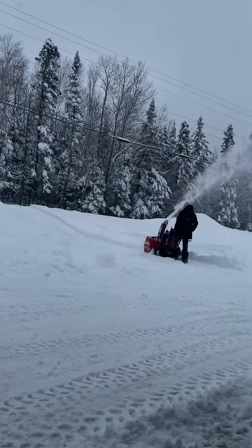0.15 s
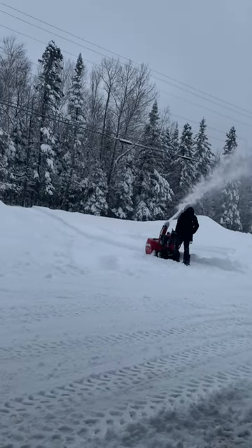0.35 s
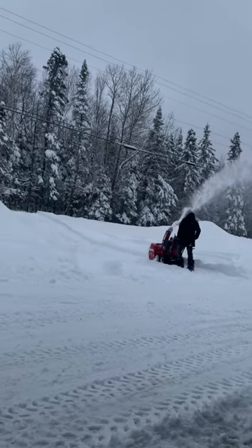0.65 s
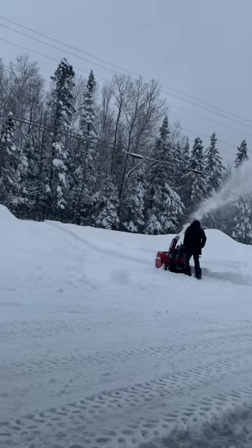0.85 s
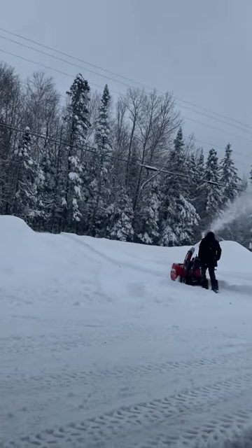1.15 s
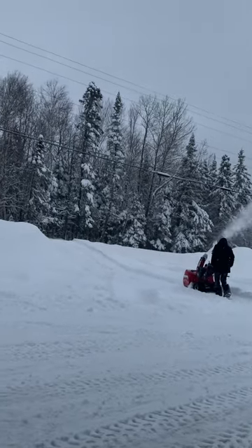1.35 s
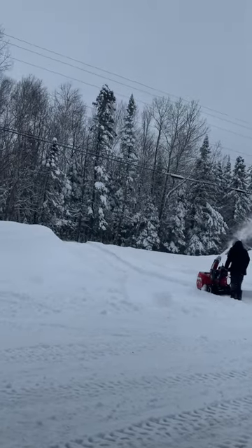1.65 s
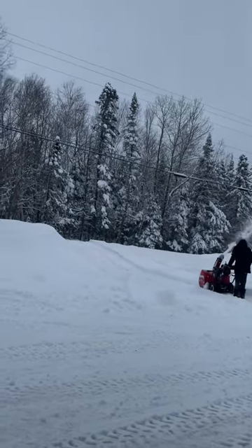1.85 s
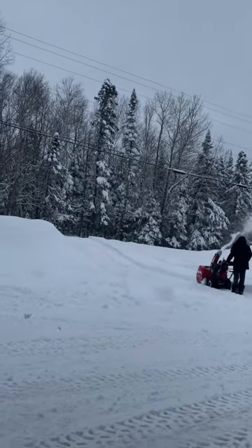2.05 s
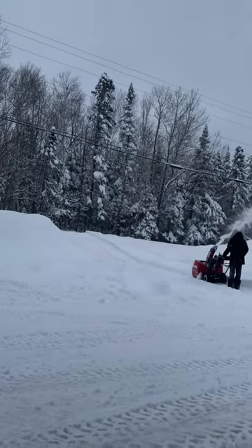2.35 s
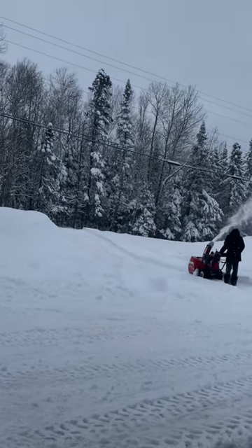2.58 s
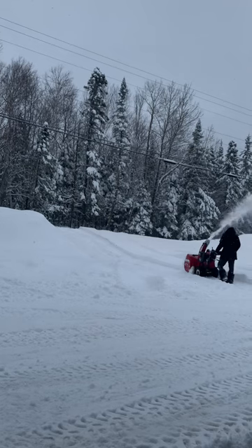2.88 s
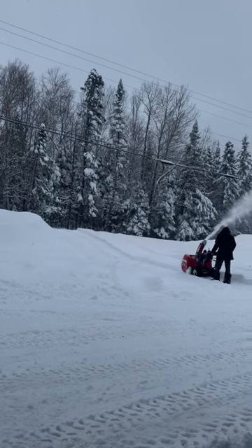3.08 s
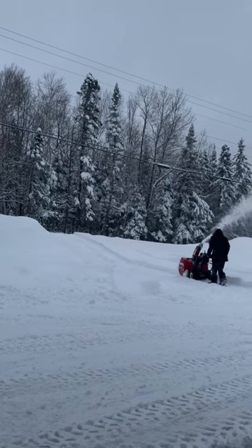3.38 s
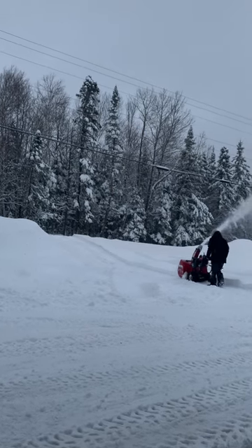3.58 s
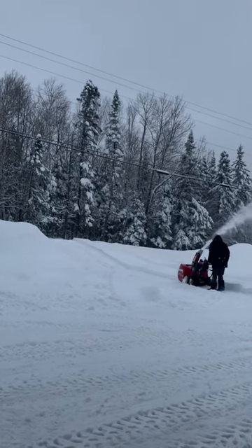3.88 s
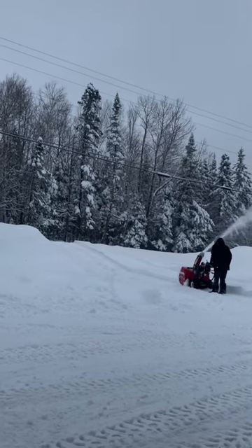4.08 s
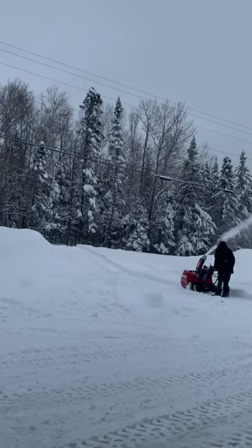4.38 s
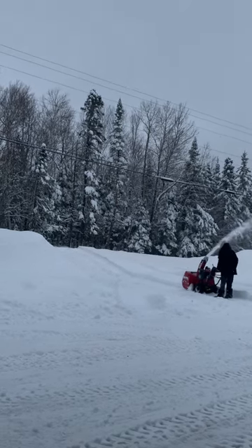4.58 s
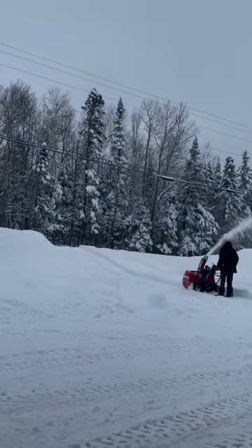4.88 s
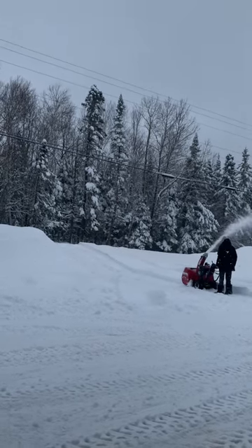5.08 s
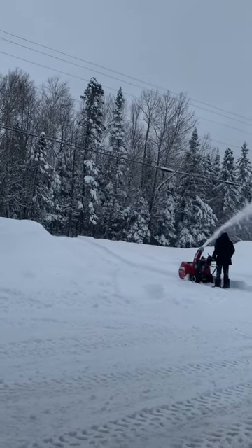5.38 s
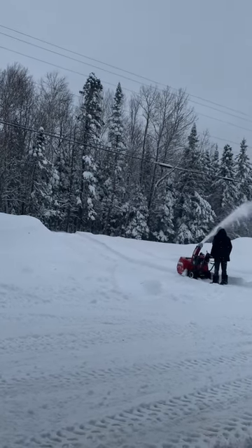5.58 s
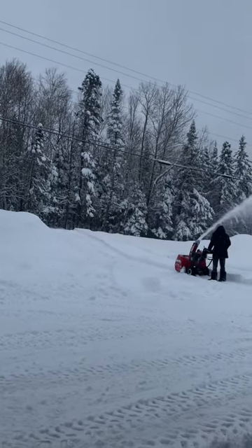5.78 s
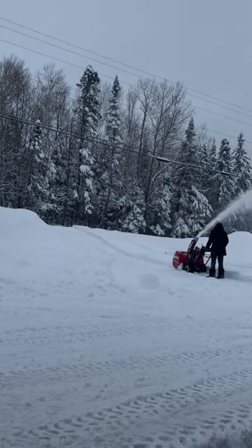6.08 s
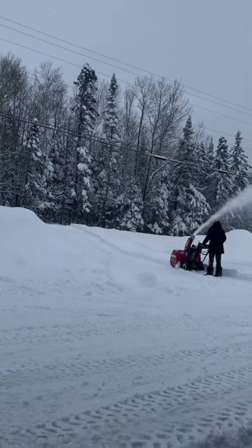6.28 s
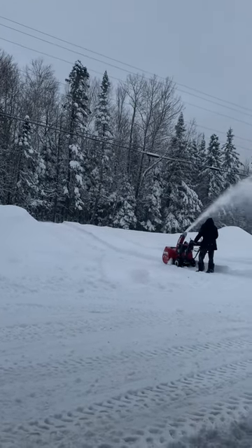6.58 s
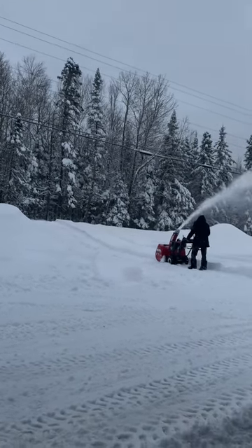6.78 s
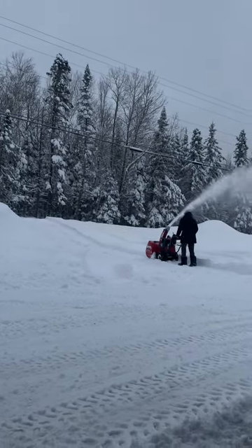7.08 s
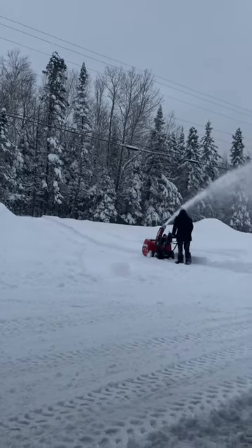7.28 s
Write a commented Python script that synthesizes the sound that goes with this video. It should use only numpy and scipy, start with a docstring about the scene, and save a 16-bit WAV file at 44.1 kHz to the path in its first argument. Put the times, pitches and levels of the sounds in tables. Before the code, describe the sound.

A continuous petrol-engine drone, about thirty firings a second, throbs roughly with uneven impeller beats. Midrange metallic chatter dominates over low rumble, with a softer hiss of gas and snow. Occasional dull clanks come first, then denser irregular knocks after the middle as the snowblower turns its back. Open snowy ground, no reverberation, captured on a handheld stereo phone at some distance; it never starts or stops.

```python
"""Deep snow: some way off a walk-behind snowblower slowly turns its back on a handheld two-port phone.
A single-cylinder four-stroke fires about thirty times a second, as a stack of harmonics; a belt drives the
impeller a little slower, so its own stack beats with the first. Shaped noise makes rumble, clatter and the
hiss of gas and thrown snow; blows on ringing sheet metal make the knocks. Only the holder's body echoes it."""
import sys
import numpy as np
from scipy import signal
from scipy.fft import rfft, irfft
from scipy.io import wavfile
from scipy.ndimage import uniform_filter1d, map_coordinates

SR = 44100
rng = np.random.default_rng(int(sys.argv[2]) if len(sys.argv) > 2 else 0)


def transcribe(signal):
    """Save signal, clipped to [-1, 1], as a 16-bit WAV file at the path in sys.argv[1]."""
    frames = np.atleast_2d(signal).T
    limited = np.clip(frames, -1, 1)
    pcm = np.round(limited * 32767).astype(np.int16)
    wavfile.write(sys.argv[1], SR, pcm)


def makeup_ratio(level_db):
    """Linear amplitude ratio for a level in decibels (20 dB per factor of ten)."""
    decades = np.asarray(level_db, float) / 20
    return 10 ** decades


N = 328104
T = np.arange(N) / SR
F = np.fft.rfftfreq(N, 1 / SR)


def level(x, db):
    """Scale to an rms level."""
    return x * makeup_ratio(db) / np.sqrt(np.mean(x ** 2))


def curves(table):
    """Columns of a time table, sample by sample."""
    times, *columns = np.transpose(table)
    return [np.interp(T, times, c) for c in columns]


def noise(table, low_hz, high_hz):
    """Noise in the colour of a table, between two soft edges; rms 1."""
    hz, colour_db = np.transpose(table)
    colour = makeup_ratio(np.interp(np.log(F + 1), np.log(hz), colour_db))
    edges = 1 / np.sqrt((1 + (low_hz / (F + 1)) ** 8) * (1 + (F / high_hz) ** 8))
    return level(irfft(rfft(rng.standard_normal(N)) * colour * edges, N), 0)


def walk(rate):
    """Random levels held 1 / rate s and slewed twice; spread near 1."""
    hold = int(SR / rate)
    steps = np.repeat(rng.standard_normal(400), hold)[:N]
    return 1.3 * uniform_filter1d(uniform_filter1d(steps, hold), hold)


def puffs(cycles, length, scatter_db):
    """A sharp rise and fading tail once a cycle, each cycle with its own size; length in cycles."""
    size = makeup_ratio(scatter_db * rng.standard_normal(400))[cycles.astype(int)]
    return uniform_filter1d(size * np.exp(-(cycles % 1) / length), size=200)


def stack(cycles, table, away, smear, waver_db, rate):
    """Tones locked to a turning shaft; higher ones lag more, and each wavers in level."""
    out = 0
    for multiple, *stance_db in table:
        db = np.interp(away, [0, .5, 1], stance_db) + waver_db * walk(rate)
        phase = 2 * np.pi * multiple * cycles - smear * multiple ** 2
        out = out + np.sqrt(2) * makeup_ratio(db) * np.cos(phase)
    return out


# How far the machine has turned its back on the phone, 0 facing to 1 away. Columns: time_s, away_0_to_1
STANCE = [(0, 0.05), (1.3, 0.1), (2.6, 0.28), (3.7, 0.63), (5, 0.95), (7.44, 1)]


def turned_away():
    """The turn of the machine, which reweights the sounds that reach the phone."""
    return curves(STANCE)[0]


# Engine speed that the governor hunts round. Columns: time_s, firing_hz
FIRING = [(0, 29.945), (1, 30.208), (2.6, 30.394), (3.9, 31.068), (4.5, 31.349), (4.72, 30.949),
          (4.95, 31.508), (6, 31.263), (7.44, 31.492)]


def firing_rate():
    """Firings per second: the governor hunts round the table's rate and settles."""
    swing_hz, pace_hz, first_peak_s, settled_s = .35, 2.16, .286, 7.44
    fading = swing_hz * (1 - T / settled_s)
    return curves(FIRING)[0] + fading * np.cos(2 * np.pi * pace_hz * (T - first_peak_s))


# Belt ratio. Columns: time_s, impeller_turns_per_firing
BELT = [(0, .784), (2.6, .784), (3.7, .792), (7.44, .792)]


def impeller_turns(firing_hz, away):
    """Turns so far: the impeller runs a little ahead or behind as snow loads it."""
    load_turns = (0.0085 + 0.027 * away) * walk(6)
    return 1 + np.cumsum(firing_hz * curves(BELT)[0]) / SR + load_turns


# Colour of the low rumble. Columns: freq_hz, relative_db
RUMBLE = [(40, -28), (60, -10), (90, 0), (130, -5), (250, -6), (290, -8.5), (330, -18.5), (500, -25),
          (700, -41)]


def rumble(away):
    """Low coloured noise, weaker from behind."""
    return level(noise(RUMBLE, 30, 800), -26.5) * makeup_ratio(-3.5 * away + 0.54 * walk(12))


# Colour shared by clatter, hiss and spray. Columns: freq_hz, relative_db_per_hz
BROAD = [(430, -10.5), (520, -9.5), (800, -2), (950, -1), (1080, -7), (1500, -4.5), (1800, -9),
         (2050, -4.5), (2400, -8), (2900, -13), (3500, -17.5), (4200, -18), (5000, -17.5), (6000, -20.5),
         (7000, -21), (9000, -22), (11000, -26), (13000, -28.5), (15500, -38)]


def broad_noise(low_hz, high_hz):
    """The machine's broad noise, cut to one range."""
    return noise(BROAD, low_hz, high_hz)


def hiss(fires, turns, away, hiss_db, shared):
    """Gas and thrown snow: two noise bands throb with firings, then more with the impeller from behind."""
    gas, bite = puffs(fires - .3, 0.34, 2.3), puffs(turns - .3, 0.28, 5.94)
    throb = 1 + (1.2 - 0.7 * away) * gas + (0.33 + 0.15 * away) * bite
    mid_db = hiss_db + 4.5 + 1.6 * shared + 0.67 * walk(7.1)
    high_db = hiss_db + 3 + 0.63 * shared + 0.45 * walk(7)
    mid = level(throb * broad_noise(2760, 6000), 0) * makeup_ratio(mid_db)
    high = level(throb * broad_noise(5660, 17000), 0) * makeup_ratio(high_db)
    return mid + high


# Colour of the chute's rattle. Columns: freq_hz, relative_db
CHUTE = [(1700, -22), (1950, -1), (2060, -2), (2200, -2), (2400, -17), (2600, -2), (2900, -30)]


def chute_rattle(turns, away):
    """Narrow bands of noise pulse with the impeller turns, louder from behind."""
    pulses = 0.2 + puffs(turns - .72, 0.17, 7.1)
    return level(pulses * noise(CHUTE, 1500, 3000), -43.5) * makeup_ratio(1.3 * walk(1.8) + 5.1 * away)


# Ringing modes of the sheet-metal housing. Columns: freq_hz, t60_s, relative_db
HOUSING = [(641, 0.13, -10.5), (809.5, 0.14, -5.5), (945, 0.14, -1), (1120, 0.11, -11.5),
           (1280, 0.16, -5.5), (1556, 0.043, 2), (1804, 0.029, 1), (2055, 0.075, 6), (2300, 0.033, -18),
           (2620, 0.12, -16), (4320, 0.062, -10)]


def ring(blows, low_gain):
    """Blows ring the housing modes as decaying sines; those under 1.1 kHz take their own share."""
    out = 0
    for hz, t60, db in HOUSING:
        pole = np.exp(2j * np.pi * hz / SR - np.log(1000) / (t60 * SR))
        push = blows * (low_gain if hz < 1100 else 1)
        out = out + makeup_ratio(db) * signal.lfilter([1], [1, -pole], push).imag
    return out


def clatter(fires, turns, away, clatter_db, shared):
    """Noise chugging with the firings and the impeller's bites keeps the sheet metal singing."""
    bite = puffs(turns - .3, 0.28, 5.94)
    chug = puffs(fires - .22, 0.09, 3.0)
    throb = 1 + (1.1 - 0.31 * away) * chug + (.2 - 0.095 * away) * bite
    wander_db = 0.81 * shared + 0.23 * walk(9)
    low = level(throb * broad_noise(462, 2890), 0) * makeup_ratio(clatter_db + 2.0 + wander_db)
    return low + level(ring(low, 1.54), -38.0)


# Load on the machine, as levels before each band's own offset. Columns: time_s, clatter_db, hiss_db
LOAD = [(0, -28.5, -39.5), (1.8, -28.5, -39.5), (2.8, -28, -40.5), (3.9, -30, -42), (5.4, -28.5, -40),
        (6.5, -28.5, -40), (7, -29.5, -40.5), (7.44, -28, -40)]


def broadband(fires, turns, away):
    """Clatter below, hiss above, sharing one wander in level, with the chute's rattle."""
    clatter_db, hiss_db = curves(LOAD)
    shared = walk(18)
    return (clatter(fires, turns, away, clatter_db, shared) + chute_rattle(turns, away)
            + hiss(fires, turns, away, hiss_db, shared))


def lesser_knocks(turns):
    """Times and levels of the weaker knocks, on impeller turns picked by chance."""
    share, usual_db, scatter_db = .1, -19.5, 2.5
    times = T[1:][np.diff(np.floor(turns - .72)) > 0]
    luck, size = rng.random(len(times)), rng.standard_normal(len(times))
    return [(s, usual_db + scatter_db * z) for s, u, z in zip(times, luck, size)
            if u < share and s < T[-1] - .02]


# Loud knocks of packed snow in the housing. Columns: start_s (before a 0.98 ms lag), relative_db
KNOCKS = [(0.141, -13), (0.615, -11), (1.2027, -11), (1.7963, -18), (2.5463, -16), (3.0475, -17),
          (3.3762, -20), (3.5049, -12.5), (3.6694, -13), (3.8302, -15), (3.9643, -14.5), (4.1273, -11),
          (4.576, -13), (5.0558, -13), (5.1731, -12.5), (5.3029, -16), (5.4184, -13), (5.902, -12),
          (6.102, -8), (6.2996, -11.5), (6.3425, -11), (6.42, -10.5), (6.547, -16), (6.5864, -8),
          (6.7443, -14), (6.8678, -12), (7.0324, -15.5), (7.3123, -10), (7.3462, -11)]


def knocks(turns, away):
    """A ragged blow at each impeller turn, stronger from behind, and louder knocks among them."""
    ragged = puffs(turns - .72, .1, 2.9) * rng.standard_normal(N)
    steady = level(ring(ragged, 1.1), -41.5) * makeup_ratio(7.4 * away)
    blows, low_gain, splash = np.zeros(N), np.ones(N), np.zeros(N)
    span = np.arange(400)
    for s, db in KNOCKS + lesser_knocks(turns):
        at = int((s + 0.00098) * SR) + span
        # a short push, then the lump crumbles against the metal for a few milliseconds
        blows[at[:3]] += makeup_ratio(db - 4)
        blows[at] += makeup_ratio(db - 12) * np.exp(-span / 68.0) * rng.standard_normal(len(span))
        # each knock rings the low modes by its own amount
        low_gain[at] = makeup_ratio(-4.5 + 4.5 * rng.standard_normal())
        splash[at] += makeup_ratio(db) * np.exp(-span / 150.)
    spray = makeup_ratio(-27) * uniform_filter1d(splash, size=60) * broad_noise(3000, 16000)
    return steady + makeup_ratio(-20) * ring(blows, low_gain) + spray


# Impeller tones by stance, rms levels before wavering; the 3.5 and 4.5 rows stand for in-between tones,
# probably sums of engine and impeller rates.
# Columns: multiple_of_impeller_rate, facing_db, side_on_db, turned_away_db
IMPELLER = [(2, -41, -42, -47), (3, -30.5, -32, -37.5), (3.5, -52, -40, -37.5), (4, -28.5, -32, -38.5),
            (4.5, -46, -34.5, -37), (5, -37.5, -37.5, -39), (6, -35.5, -39, -38.5), (7, -41.5, -34, -43),
            (8, -37.5, -39.5, -39), (9, -37.5, -39.5, -43.5), (10, -41, -43, -39), (11, -44, -49, -45),
            (12, -35.5, -51.5, -72), (13, -49, -66, -65)]


def impeller(turns, away):
    """Tones at multiples of the impeller's rate, with two in-between tones."""
    return stack(turns, IMPELLER, away, .3, 1.7, 8.6)


# Exhaust harmonics by stance, rms levels before wavering.
# Columns: multiple_of_firing_rate, facing_db, side_on_db, turned_away_db
EXHAUST = [(1, -55, -57, -66), (2, -27, -28, -30), (3, -51, -44, -41), (4, -30, -26.5, -32.5),
           (5, -27.5, -26, -26), (6, -34.5, -34.5, -32), (7, -43.5, -38.5, -31.5), (8, -33.5, -33.5, -38),
           (9, -38, -41.5, -45.5), (10, -41, -58, -62), (11, -44, -44.5, -60), (12, -40.5, -44, -59),
           (13, -46.5, -49.5, -56.5), (14, -47, -54, -66)]


def exhaust(fires, away):
    """Tones of the engine's regular firing, at multiples of its rate."""
    return stack(fires, EXHAUST, away, .9, 0.8, 5)


# Delay of the bounce off the holder, as the hand drifts. Columns: time_s, delay_ms
HAND = [(0, 1.273), (.8, 1.285), (1.5, 1.187), (2.6, 1.235), (4.4, 1.162), (5.4, 1.21), (6.3, 1.219),
        (6.7, 1.268), (7.44, 1.292)]


def hand_delay_ms(times):
    """The drifting hand changes the path by way of the holder's body."""
    return np.interp(times, *np.transpose(HAND))


def bounce(x, share):
    """The treble comes again off the holder's body, later or sooner as the hand drifts."""
    band = (1 + (2300 / (F + 1)) ** 6) * (1 + (F / 9000) ** 6)
    treble = irfft(rfft(x) / band, N)
    heard_at = np.arange(N) - hand_delay_ms(T) * SR / 1000
    return x + share * map_coordinates(treble, [heard_at], order=3)


# Stereo image by frequency, only partly the work of the phone's two ports; the lead holds at a 1.2 ms
# bounce. Columns: freq_hz, left_lead_rad, left_minus_right_db, likeness_0_to_1 (clipped),
# lead_change_rad_per_ms of bounce delay
STEREO_IMAGE = [(60, 0, -0.1, 0.97, 0), (140, 0, -1.66, .995, -4), (271, -0.01, -3, 0.98, 1),
                (520, 0.58, -1.5, 0.89, 0), (850, 0.92, 2, 0.97, 0), (1300, 0, -0.3, 0.95, -1.5),
                (1876, 0.16, 0, 1, 6), (2185, 2.5, -2.5, 0.97, -5), (2656, 3, 2.5, 0.86, -15),
                (2820, 1.5, 0, 0.93, 11.5), (3268, 3.5, -0.5, 0.89, 8.5), (3585, 5.5, 14, 0.98, 32),
                (3860, 9, 4, 0.7, 8), (4260, 8.5, 0.5, 0.3, -20), (4890, 9.5, 0.1, 0.94, 1),
                (5900, 10, 2, 0.88, -0.5), (6540, 11, -1, 0.9, 4), (7600, 12, 0.5, 1, 1),
                (9450, 13, -0.5, 0.88, 1), (11780, 15.5, 1, 1, 1), (13400, 15.5, -0.5, 1, -3),
                (15000, 19, 0, .93, -5)]


def stereo_image(direct, other):
    """Left and right differ in phase and level by frequency, and each has a share unlike the other."""
    f, t, same = signal.stft(direct, SR, nperseg=1024)
    apart = signal.stft(other, SR, nperseg=1024)[2]
    hz, *columns = np.transpose(STEREO_IMAGE)
    lead, balance_db, like, drift = (np.interp(f, hz, c)[:, None] for c in columns)
    like = np.clip(like, 0, 1)
    same = same * np.sqrt((1 + like) / 2)
    apart = apart * np.sqrt((1 - like) / 2)
    # the hand that shifts the bounce also tilts the phone
    tilt_ms = hand_delay_ms(t) - 1.2
    turn = makeup_ratio(balance_db / 2) * np.exp(.5j * (lead + drift * tilt_ms))
    left, right = (same + apart) * turn, (same - apart) / turn
    return signal.istft(np.array([left, right]), SR)[1][:, :N]


def scene():
    """Two tone stacks, rumble, clatter, hiss and knocks, spread into stereo."""
    away = turned_away()
    firing_hz = firing_rate()
    fires = 1 + np.cumsum(firing_hz) / SR
    turns = impeller_turns(firing_hz, away)
    tones = exhaust(fires, away) + impeller(turns, away)
    # two independent draws of the noisy layers: the second makes left and right unlike
    first, second = (rumble(away) + broadband(fires, turns, away) + knocks(turns, away) for _ in range(2))
    return stereo_image(tones + bounce(first, 0.36), second)


def top_cut(x):
    """Nothing passes above the cut-off."""
    return signal.sosfilt(signal.butter(12, 16390, fs=SR, output="sos"), x)


def record(dry):
    """The finished mix as the phone keeps it."""
    return top_cut(dry)


dry = scene()
out = record(dry)
transcribe(out)
```